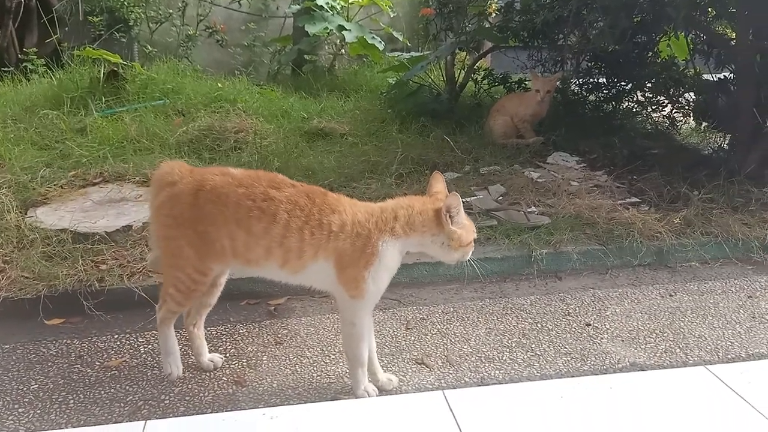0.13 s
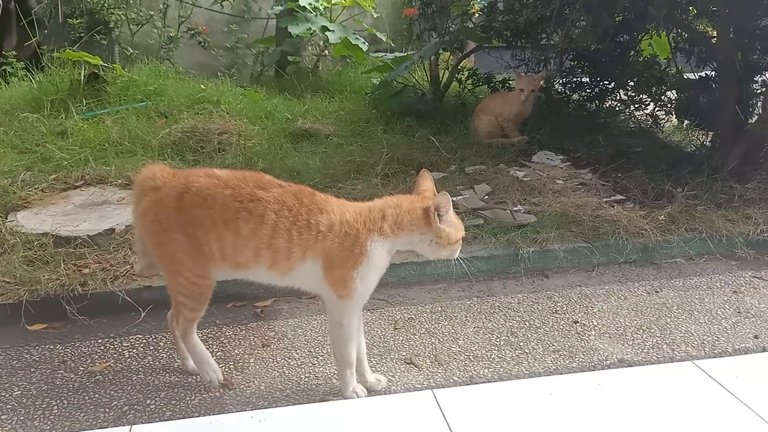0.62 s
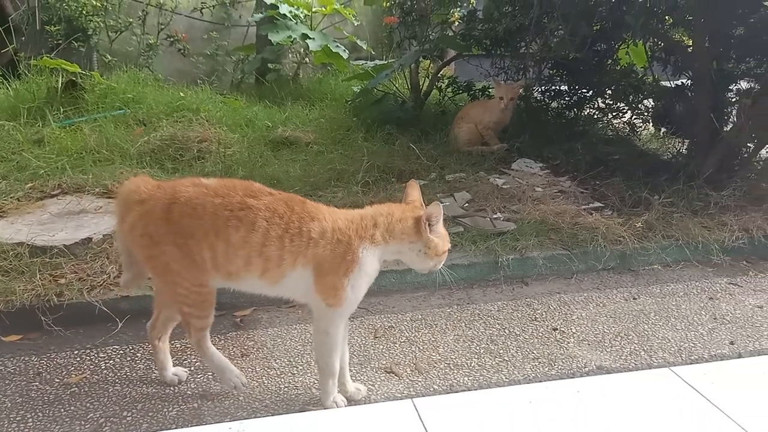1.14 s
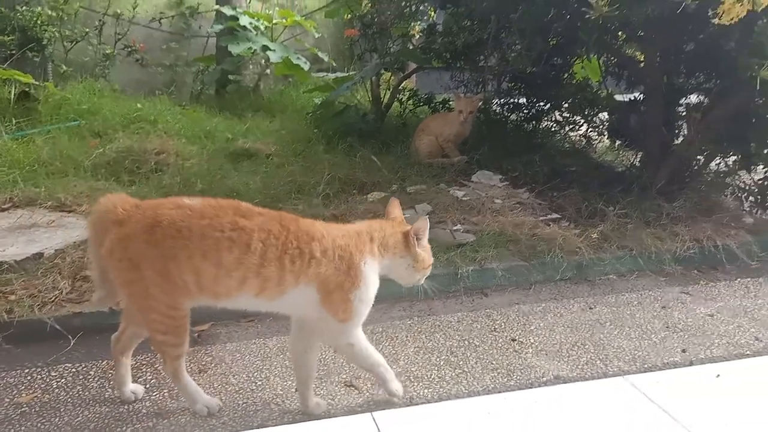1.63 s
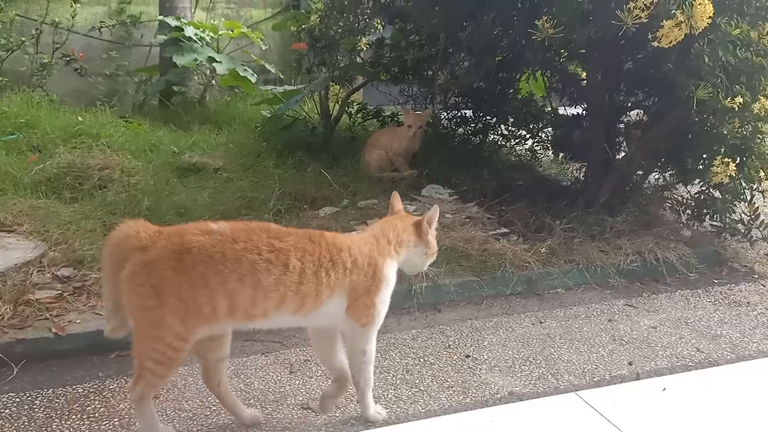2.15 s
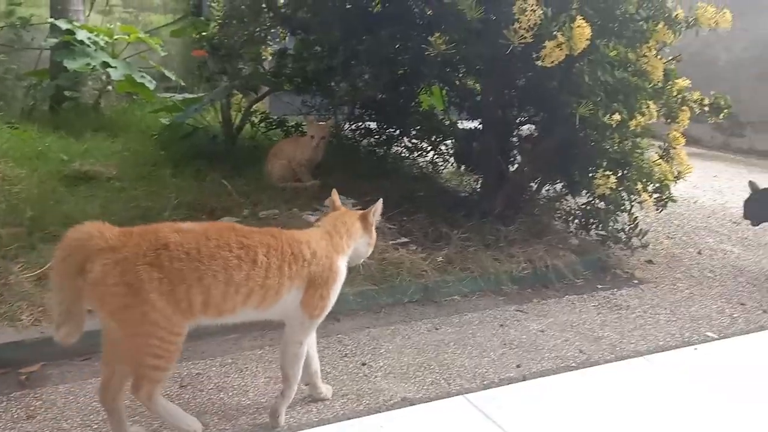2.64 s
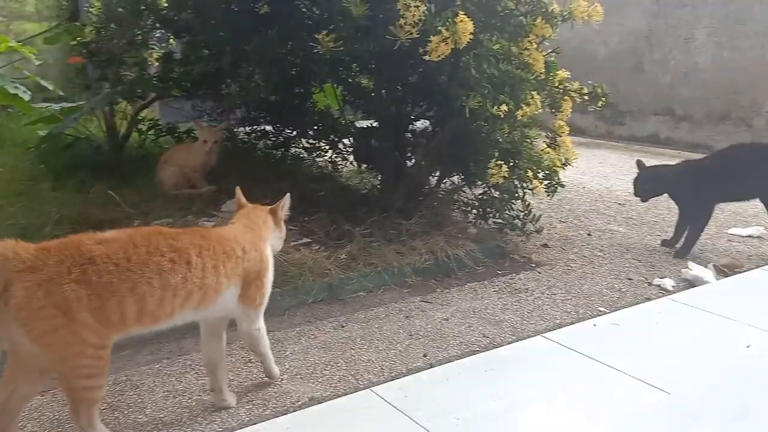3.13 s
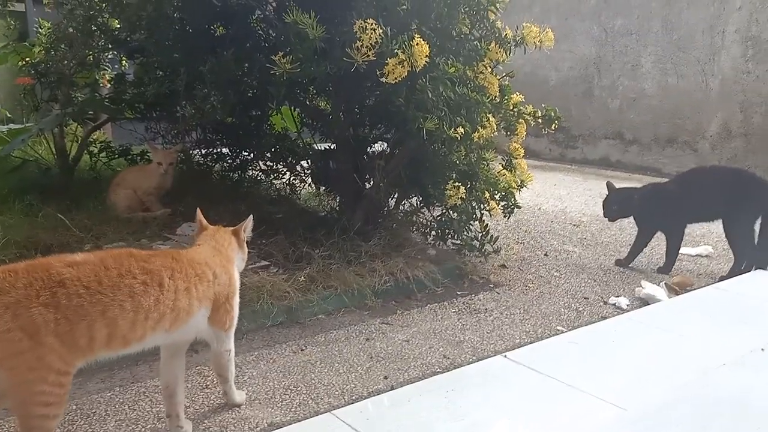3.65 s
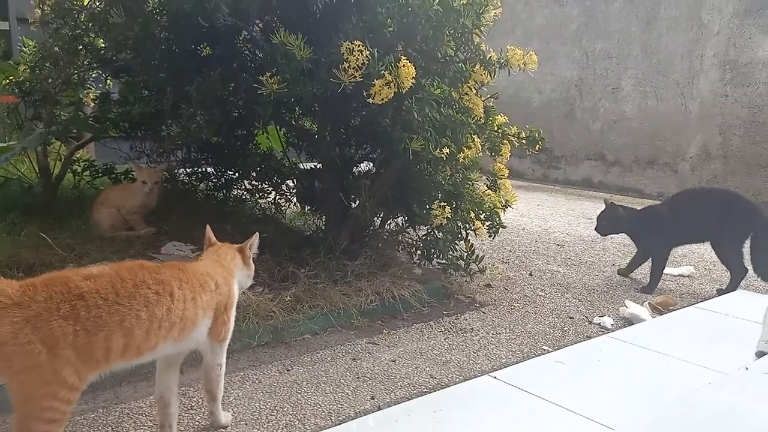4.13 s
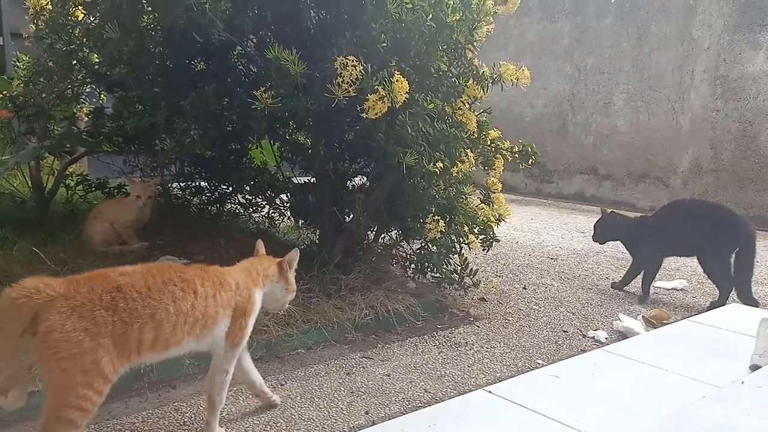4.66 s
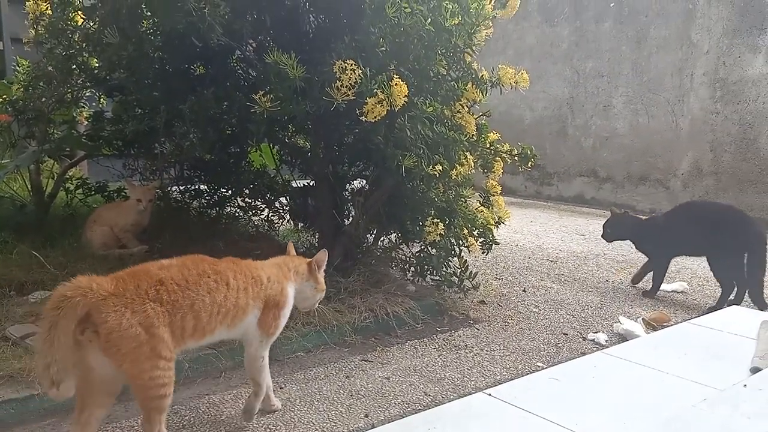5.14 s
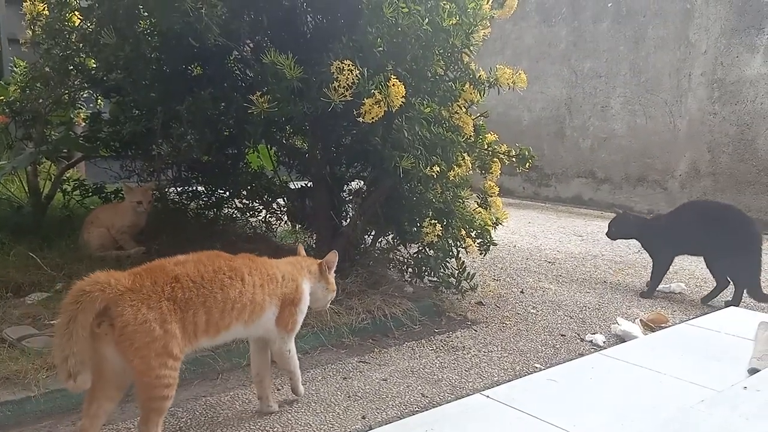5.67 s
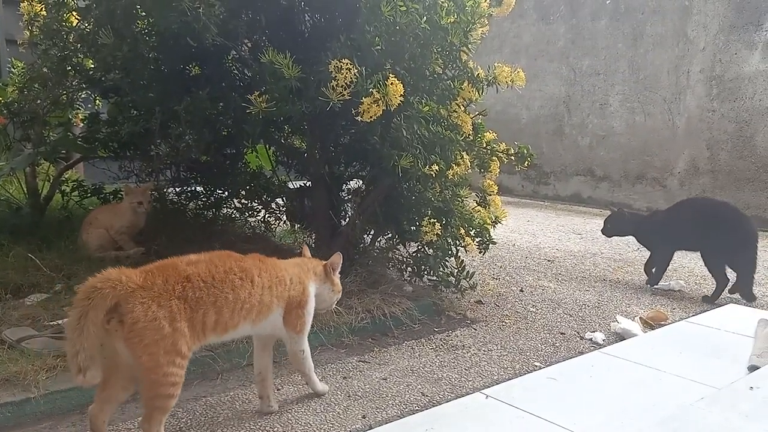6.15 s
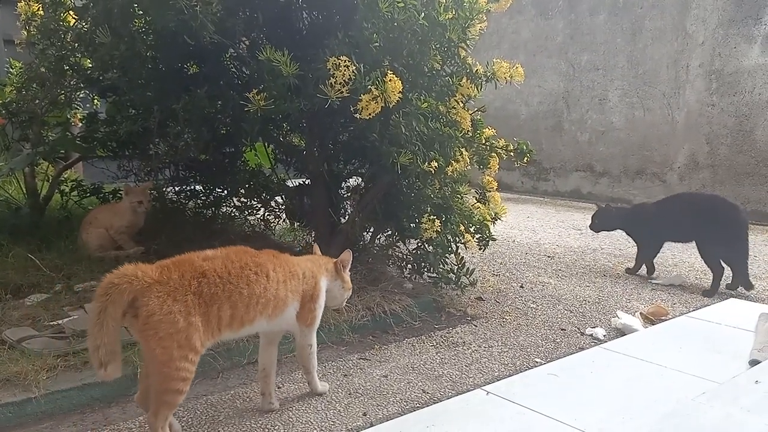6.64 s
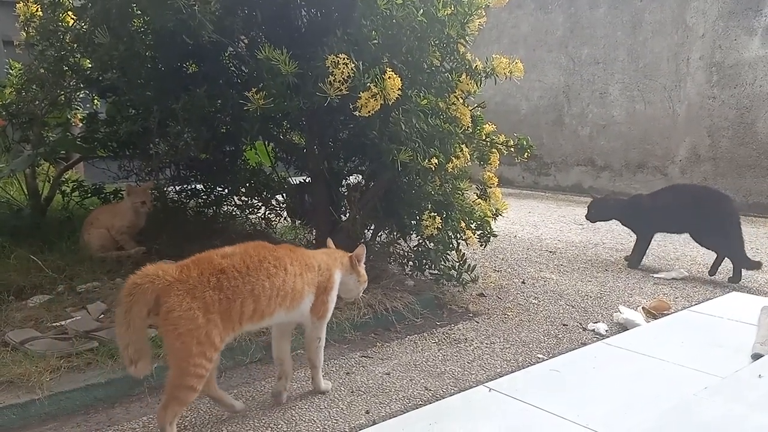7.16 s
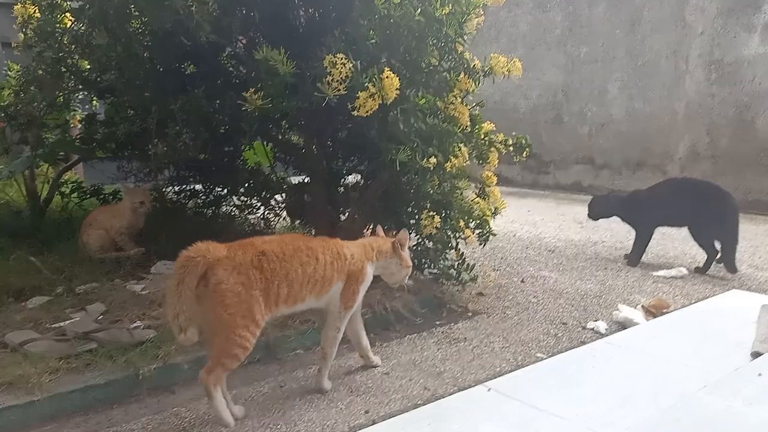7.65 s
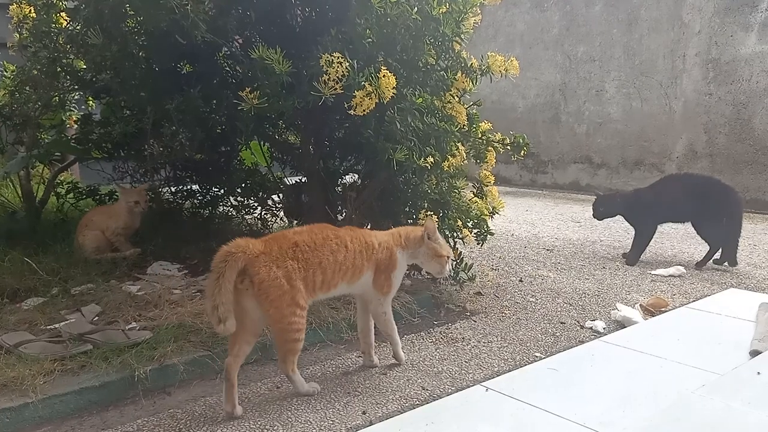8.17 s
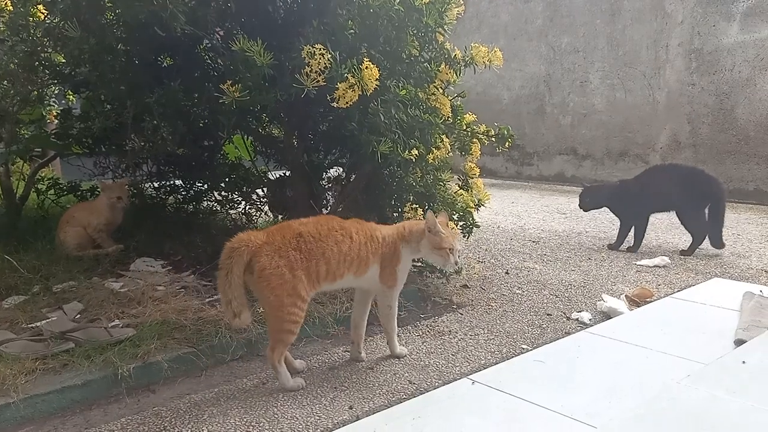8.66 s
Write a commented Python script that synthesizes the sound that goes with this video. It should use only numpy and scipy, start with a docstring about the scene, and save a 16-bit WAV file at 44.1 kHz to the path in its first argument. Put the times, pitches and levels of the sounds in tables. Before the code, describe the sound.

Several cats caterwaul outdoors, bright open-mouthed yowls and darker wavering moans overlapping almost without pause, with slight yard echo and faint low rumble.

```python
"""Yowling cats in a walled yard

Several cats, with bright open-mouthed and darker voices, yowl over one another near a hand-held phone.
Each yowl is a sum of harmonics on a gliding pitch, shaped by moving throat and mouth resonances;
breath modulates each line, and alternating strong and weak pulses add lines half-way between.
Delayed copies and a decaying noise tail give the yard; filtered noise gives rumble and hush; soft ticks,
and at 4.82 s a short hissing catch of breath, are decaying mixtures of a low tone and noise."""
import sys
import numpy as np
from scipy import signal
from scipy.fft import rfft, irfft, next_fast_len
from scipy.io import wavfile
from scipy.ndimage import uniform_filter1d

SR = 44100
rng = np.random.default_rng(int(sys.argv[2]) if len(sys.argv) > 2 else 0)


def int16_out(signal):
    """Quantize to a 16-bit WAV file."""
    q = np.round(np.clip(np.atleast_2d(signal).T, -1, 1) * 32767)
    wavfile.write(sys.argv[1], SR, q.astype(np.int16))


def voltage_ratio(decibels):
    """Convert decibels (scalar or array-like) to amplitude ratios, 20 dB per decade."""
    exponent = np.asarray(decibels, float) / 20
    return 10 ** exponent


N = 387638


def colour(x, points):
    """Linear filtering: multiplies the spectrum by a gain curve, (f/Hz, level/dB) joined on a log axis."""
    hz, db = np.transpose(points)
    # a mirrored, fading edge past the end softens the cut
    edge = x[..., :-2049:-1] * np.linspace(1, 0, 2048)
    x = np.concatenate([x, edge], axis=-1)
    size = next_fast_len(N + 4096)
    f = np.maximum(np.arange(size // 2 + 1) * SR / size, 1)
    gain = voltage_ratio(np.interp(np.log(f), np.log(hz), db))
    return irfft(rfft(x, size) * gain, size)[..., :N]


def unit(x):
    """Normalisation of signal power: scales to rms 1."""
    return x / np.sqrt(np.mean(x ** 2))


def walk(rate, count):
    """Low-pass random process: smooth chance of spread about 1 that turns about rate times a second."""
    k = max(int(SR / rate), 2)
    steps = rng.standard_normal(count // k + 3)
    joined = np.interp(np.arange(count) / k, np.arange(len(steps)), steps)
    return 2.01 * uniform_filter1d(joined, k // 2)


def overtones(rows, tract):
    """Source-filter principle: gives the dB of overtone k, lifted by two moving resonances."""
    s, hz, level_db, throat_hz, mouth_hz, mouth_db, high_db = np.transpose(rows)
    (throat_width_hz, mouth_width_hz), low_db, middle, chest_db_per_octave = tract
    middle_hz, middle_db = np.transpose(middle)
    chest_hz = 406  # below this pitch the lowest overtones gain weight

    def db_of(k, t):
        f = k * np.interp(t, s, hz)
        level = voltage_ratio(np.interp(t, s, level_db))
        throat_offset = (f - np.interp(t, s, throat_hz)) / throat_width_hz
        throat = level / (1 + throat_offset ** 2)
        mouth_offset = (f - np.interp(t, s, mouth_hz)) / mouth_width_hz
        mouth = level * voltage_ratio(np.interp(t, s, mouth_db)) / (1 + mouth_offset ** 2)
        # away from the resonances
        if k <= len(low_db):
            chest_db = chest_db_per_octave * np.log2(np.maximum(chest_hz * k / f, 1)) / k
            away = level * voltage_ratio(np.interp(k, np.arange(len(low_db)) + 1, low_db) + chest_db)
        else:
            away_db = np.interp(np.log(f), np.log(middle_hz), middle_db)
            away = voltage_ratio(np.interp(t, s, high_db) + away_db)
        return 10 * np.log10(throat ** 2 + mouth ** 2 + away ** 2)
    return db_of


def yowl(rows, kind, db_of, played, jitter, shimmer_db, rasp_db, mouth=None, hoarse_db=-17, sway_db=3):
    """Additive synthesis: harmonics of one wavering pitch, each modulated in amplitude by breath."""
    # kind is 0 for a bright voice, 1 for a dark one
    # unsteady folds, quick scatter of the pitch: t/s, bright voices scatter/%, dark voices scatter/%
    croak = [(0, .8, .1), (.12, 2.2, .1), (.22, 1.4, .1), (.3, .12, .08), (1.1, .12, .08), (1.3, .25, .08),
             (2.2, .25, .08), (2.5, .15, .08), (3.35, 1.3, .06), (3.55, .7, .1), (3.85, .4, .15),
             (4.0, .15, .15), (4.2, .3, .15), (4.5, .15, .15), (5.0, .15, .15), (5.4, .3, .15),
             (5.62, .3, 1.5), (5.74, .3, 1.1), (5.84, .35, .3), (6.0, .3, .25), (6.3, .25, .15),
             (6.6, .4, .15), (6.72, 1.6, .15), (6.82, .35, .15), (7.1, .45, .15), (7.3, .35, .15),
             (7.5, .15, .15), (7.72, 1.8, .15), (7.84, .3, .15), (7.95, .06, .15), (8.79, .1, .15)]
    # turbulent breath near the front of the mouth: t/s, bright voices level/dB, dark voices level/dB re the line
    breath_levels = [(0, -22, -30), (1.1, -24, -30), (1.35, -18, -30), (2.0, -19, -30), (2.4, -28, -24),
                     (3.0, -24, -19), (3.4, -18, -20), (4.0, -26, -28), (5.0, -30, -28), (5.3, -18, -28),
                     (5.5, -18, -14), (5.7, -24, -10), (6.25, -16, -14), (6.45, -26, -24), (6.85, -20, -22),
                     (7.05, -12, -16), (7.35, -13, -16), (7.55, -22, -12), (8.0, -26, -6), (8.79, -22, -6)]
    # centre of the breath band for the bright and the dark voices: f/Hz
    breath_hz = (2800, 2600)
    breath_width_hz = 450  # half-width

    s, hz, *columns = np.transpose(rows)
    start, stop = int(max(s[0], 0) * SR), min(int(s[-1] * SR), N)
    stop = N if stop > N - 999 else stop  # a yowl that lasts past the end
    t = np.arange(start, stop) / SR
    count = len(t)

    # slack folds: a fast scoop or drop croaks; its high overtones are weaker and ring lower
    pitch = np.interp(t, s, hz)
    glide = abs(np.gradient(np.log(pitch))) * SR
    slack = np.clip(uniform_filter1d(glide, size=900) / 4.0, 0, 1) ** 2
    pitch = pitch * (1 + jitter * walk(60, count) + 0.0077 * slack * walk(150, count))
    times, *percent = np.transpose(croak)
    scatter = walk(260, count)
    scatter = scatter - uniform_filter1d(scatter, size=900)  # the mean pitch holds
    pitch = pitch * (1 + np.interp(t, times, percent[kind]) / 100 * scatter)
    phase = 2 * np.pi * np.cumsum(pitch) / SR

    times, *breath_db = np.transpose(breath_levels)
    breath_depth = voltage_ratio(np.interp(t, times, breath_db[kind]))

    def breath(k):
        return breath_depth / (1 + ((k * pitch - breath_hz[kind]) / breath_width_hz) ** 4)

    out = 0
    for k in played:
        rasp = (voltage_ratio(rasp_db) + 0.051 * slack + breath(k)) * walk(280, count)
        shimmer = shimmer_db * np.sqrt(k / 3) * walk(29.84, count)
        out = out + voltage_ratio(db_of(k, t) + shimmer) * (1 + rasp) * np.sin(k * phase + k * k)
    if mouth:
        f, db = np.transpose(mouth)
        high = 0
        for k in range(len(played) + 1, 36):
            flutter_db = sway_db * walk(6.81, count) + 0.87 * sway_db * walk(25.14, count)
            rasp = (voltage_ratio(hoarse_db) + breath(k)) * walk(500, count)
            seen_hz = k * pitch * (1 + 0.28 * np.sqrt(slack))
            line_db = np.interp(np.log(seen_hz), np.log(f), db) + flutter_db
            high = high + voltage_ratio(line_db) * (1 + rasp) * np.sin(k * phase + k * k)
        # the running rms is levelled, so the last column of rows sets the strength
        spread = np.sqrt(2 * uniform_filter1d(high ** 2, size=8192))
        out = out + voltage_ratio(np.interp(t, s, columns[-1]) - 9 * np.sqrt(slack)) * high / spread

    fade_in = t - s[0] + (start == 0)
    fade_out = s[-1] - t + (stop > N - 999)
    fade = np.clip(np.minimum(fade_in, fade_out) / 0.0071, 0, 1)
    voice = np.zeros(N)
    voice[start:stop] = np.sqrt(2) * out * fade
    return voice


def bright_voices():
    """Vocal-tract resonance: open-mouthed yowls whose jaw opening filters the high overtones."""
    # yowls: t/s, pitch f/Hz, level/dB, throat resonance f/Hz, mouth resonance f/Hz,
    # mouth resonance level/dB re the level, high overtones level/dB
    yowls = [
        [(0.0, 227.4, -48, 1283, 2180, -46, -61), (0.04, 226, -49, 1230, 2150.0, -43, -54.5),
         (0.076, 279.6, -50.5, 984, 2160, -36.5, -74.5), (0.12, 326.1, -36, 1000, 2264, -25, -70.5),
         (0.185, 382.7, -29.5, 1015, 2330, -17, -57.5), (0.209, 380.6, -37.5, 1059, 2190, -21, -58.5),
         (0.27, 391.1, -31.5, 1080, 2303, 1, -59.5), (0.331, 388.4, -30.5, 1046, 2350, -20.5, -56.5),
         (0.433, 380.8, -32.5, 1478, 2493, -6, -58.5), (0.577, 372.1, -28.5, 984, 2484, -7.5, -61),
         (0.68, 381, -31, 1064, 2414, -7, -59.5), (0.976, 369.5, -26, 1285, 2490, -9, -57),
         (1.102, 354.4, -28, 1394, 2274, -7, -54), (1.2, 364.9, -25.5, 1295, 1785, -8.5, -51),
         (1.299, 372, -28.5, 1215, 1802, 1, -43), (1.323, 380.7, -27, 1416, 1880, 3, -42),
         (1.5, 371.7, -26.5, 1268, 2050, 1.5, -46), (1.639, 370.5, -30.5, 1273, 1940, 9.5, -49),
         (1.726, 369, -27.5, 1260, 1984, -0.5, -43.5), (1.798, 372.1, -31, 1204, 2170, 0.5, -46),
         (1.822, 369.2, -28.5, 1386, 1844, 2.5, -45.5), (1.871, 364.4, -26.5, 1370, 1780, -6.5, -49),
         (1.933, 360.5, -27.5, 1230, 1926, 5, -50), (1.996, 356.1, -29, 1333, 1890, 8, -49.5),
         (2.202, 338.5, -30.5, 1195, 1812, 0.5, -54.5), (2.456, 337.6, -30.5, 1204, 1650, -20.5, -54.5),
         (2.722, 328.7, -34, 1042, 1956, -23.5, -62), (2.82, 316.5, -33.5, 923, 2200, -40, -71.5),
         (2.852, 321.2, -34, 945, 2390, -29, -64), (2.978, 275.7, -58.5, 870, 2710, 14.5, -79)],
        [(3.317, 273.2, -57.5, 820, 2260, -29, -92), (3.39, 331.2, -46.5, 965, 2420, -17.5, -79.5),
         (3.461, 389.4, -34, 1108, 2556, -6.5, -71), (3.53, 397.3, -40, 1290, 2665, -19, -75.5),
         (3.612, 420.1, -33.5, 1306, 2490, -39, -72), (3.74, 441.6, -31, 1306, 2404, -28, -68.5),
         (3.79, 429, -34.5, 1316, 2580, -14, -66.5), (3.87, 435, -37, 1358, 2450, -31.5, -67.5),
         (3.99, 447, -29, 1470, 2510, -20, -62.5), (4.124, 453, -26.5, 1515, 2486, -8, -59.5),
         (4.192, 461.5, -28.5, 1558, 2504, -8, -59), (4.248, 463.8, -28, 1440, 2500, -7, -64),
         (4.33, 465, -26, 1417, 2536, -6.5, -67), (4.483, 454.7, -30, 987, 2654, -28.5, -69),
         (4.66, 424, -29, 1067, 2644, -10.5, -66), (4.739, 413.5, -34.5, 919, 2454, -16.5, -64.5),
         (4.857, 398.7, -40, 974, 2390, -19.5, -67), (5.027, 375.6, -34.5, 1136, 2757, -9, -65.5),
         (5.132, 368, -34, 1340, 2850, -12, -62.5), (5.302, 371, -33, 1350, 2786, -13.5, -63.5),
         (5.364, 384.3, -33, 1324, 2993, -8.5, -61), (5.427, 395.5,  -32, 1412, 2676, -14, -65),
         (5.664, 406, -30.5, 1105, 2677, -8, -69), (5.717, 400.7, -28, 1040, 2650, -8.5, -64.5),
         (5.824, 387, -40, 1222, 2620, -5, -63), (5.88, 369.5, -40, 1280, 2500, -37, -64.5),
         (6.333, 358.3, -41, 1238, 2510, -50, -66.5), (6.473, 346.2, -39.5, 1123, 2367, -13.5, -76),
         (6.525, 338, -42, 845, 2310, -9, -88), (6.646, 310, -49, 1100, 1890, -11.5, -84.5),
         (6.74, 270.4, -53, 894, 2020, -0.5, -63.5)],
        [(6.66, 246.8, -53.5, 981, 1854, -12.5, -75), (6.751, 324, -39, 900, 2160, -9, -74),
         (6.794, 370.5, -32, 1226, 2460, -10, -60), (6.881, 390.4, -25.5, 1130, 2224, -14, -62.5),
         (6.98, 388.1, -27, 1204, 2050, -23, -59), (7.075, 379.4, -28, 1244, 1840, -18, -57),
         (7.153, 377.8, -32, 1253, 1830, -8.5, -57.5), (7.233, 373.4, -30.5, 1265, 2130, -30.5, -58),
         (7.33, 374, -32, 1285, 2105, -13.5, -57), (7.372, 381.3, -28.5, 1223, 2157, -19, -64),
         (7.435, 390, -28.5, 1060, 2460, -15, -58), (7.508, 387.6, -26, 1020, 2386, -24, -66.5),
         (7.572, 382.9, -32, 930, 2203, -7.5, -66.5), (7.628, 375.5, -38.5, 956, 2270, -44, -71),
         (7.837, 342, -40, 822, 2170, -8.5, -68), (7.877, 311.4, -47.5, 860, 2290, -13, -69.5)],
        [(7.628, 220.8, -65.5, 1066, 2170, -37, -78), (7.678, 286.6, -42, 1055, 2190, -30, -82),
         (7.724, 351.8, -36.5, 1054, 2137, -13.5, -95), (7.788, 402.7, -29, 942, 2283, -29, -100),
         (7.851, 444, -29.5, 1045, 2154, -16.5, -66.5), (7.904, 460, -30, 1142, 2363, -12, -63.5),
         (7.95, 458, -29.5, 1180, 2232, -1, -61), (8.248, 463.7, -25.5, 1078, 2015, -15.5, -61.5),
         (8.443, 457.6, -33.5, 1084, 2087, -3.5, -57.5), (8.55, 454, -31, 1140, 2314, -22.5, -56.5),
         (8.785, 415.5, -34, 915, 2703, -5, -71)],
    ]
    # half-way lines of the second and third yowl: t/s, level/dB re whole overtones, before a tilt by order
    doubled = [
        [(5.0, -44), (5.08, -31), (5.18, -17.5), (5.3, -9.5), (5.42, -15), (5.5, -8.5), (5.56, -11),
         (5.62, -16.5), (5.721, -34.5)],
        [(6.9, -42), (7.0, -31.5), (7.1, -27.5), (7.2, -21), (7.3, -38), (7.45, -42)],
    ]
    # mouth and microphone on the high overtones, jaws wide: f/Hz, relative level/dB
    wide = [(2600, 0), (3200, -6.5), (4200, -19), (5300, -10), (6050, -19.5), (7050, -10.5), (7600, -31.5),
            (8400, -45), (9500, -64.5)]
    # the same, jaws narrow: f/Hz, relative level/dB
    narrow = [(2400, 10.5), (3300, -29), (4000, -26.5), (5000, -13), (6000, -21.5), (7000, -15),
              (7700, -38), (8800, -31), (10500, -58.5)]
    # the same, narrow jaws held still: f/Hz, relative level/dB
    ringing = [(3200, -6), (3700, -20), (4100, -27), (4600, -10), (5050, 4.5), (5500, -17), (6300, -13),
               (6900, -8), (7500, -18.5), (8300, -29.5), (9000, -45.5)]
    # tract: (throat, mouth half-width f/Hz), overtones 1 to 3 off resonance level/dB re the level,
    # middle overtones off resonance (f/Hz, level/dB re the high ones), chest weight/(dB per octave)
    open_tract = (121, 119.4), (-31, -16.5, -23), [(1200, -2.5), (1800, -17.5), (2400, 9), (3000, -0.5),
                  (3600, -2)], 34.6
    # the tract of the last two yowls, same columns
    narrow_tract = (106.4, 91), (-24, -16, -23), [(1200, 2), (1800, -13.5), (2400, 4.5), (2750, 3.5),
                    (3050, -16.5), (3600, -17.5)], 34

    # jaws, hoarseness/dB, flutter/dB
    mouths = (wide, -21, 2), (wide, -14, 3), (narrow, -25, 2), (ringing, -21, 1.2)
    tracts = 2 * [open_tract] + 2 * [narrow_tract]
    voices = sum(yowl(rows, 0, overtones(rows, tract), range(1, 9), 0.001, 1.0, -33.5, *mouth)
                 for rows, mouth, tract in zip(yowls, mouths, tracts))
    return voices + sum(map(half_lines, yowls[1:], tracts[1:], doubled))


def dark_voices():
    """Vocal-tract resonance: moans with lower throat and mouth resonances and less open jaws."""
    # moans: t/s, pitch f/Hz, level/dB, throat resonance f/Hz, mouth resonance f/Hz,
    # mouth resonance level/dB re the level, high overtones level/dB
    moans = [
        [(0.0, 504.6, -24.5, 740, 1444, -32, -67.5), (0.12, 522.7, -29, 565, 1345, 3, -53.5),
         (0.271, 509.8, -30.5, 671, 1693, -5, -79.5), (0.673, 496.4, -37, 522, 1802, 10.5, -70.5),
         (0.851, 482.0, -37.5, 543, 1782, 1.5, -75.5), (0.93, 464, -38, 631, 1744, -13.5, -68.5),
         (0.998, 473.3, -39.5, 574, 1470, 10.5, -60.5), (1.136, 443.4, -39.5, 599, 1536, -10, -62.5),
         (1.298, 445.4, -38.5, 680, 2014, -11, -62.5), (1.462, 438.7, -43, 778, 2104, -3.5, -71.5),
         (1.926, 443, -43.5, 793, 2064, 4.5, -65.5), (2.143, 440.6, -47.5, 818, 1674, 14, -63.5),
         (2.198, 438.5, -47.5, 799, 1250, 0.5, -53.5), (2.328, 433.3, -50, 841, 1465, -6, -68.5),
         (2.501, 433.4, -43.5, 807, 1510, -8.5, -81.5), (2.835, 427.2, -38, 811, 2068, -15, -60),
         (3.0, 424.3, -34.5, 766, 2037, -19.5, -72), (3.2, 423, -33.5, 737, 2063, -24, -70.5),
         (3.35, 423.4, -30.5, 736, 2020, -24, -70), (3.519, 423.2, -28, 684, 2024, -34.5, -80),
         (3.6, 419.4, -33, 683, 2100, -28.5, -67), (3.731, 430, -30, 691, 1660, -34, -63.5),
         (3.85, 413.4, -28.5, 716, 1610, -27.5, -67), (3.918, 400, -38, 494, 1460, -30.5, -77.5),
         (3.932, 399, -31.5, 505, 1390, -30, -83), (3.952, 363, -31.5, 607, 1374, -31.5, -82),
         (3.985, 318, -35.5, 484, 1350, -27, -82), (4.0, 315, -58, 516, 1320, -27, -86)],
        [(5.627, 275.2, -46.5, 808, 1190, -12, -73), (5.668, 337.3, -31, 670, 1300, -13, -62),
         (5.736, 455.6, -31, 766, 1320, -11, -64), (5.822, 520.5, -28, 896, 1340, -5.5, -61.5),
         (5.98, 512.8, -31, 936, 1418, -3, -65.5), (6.04, 506.1, -30, 848, 1455, -11.5, -66.5),
         (6.085, 509.5, -27, 838, 1533, -4, -68.5), (6.125, 498, -33, 776, 1537, -17.5, -62.5),
         (6.2, 506.6, -33, 720, 1758, -3.5, -76), (6.28, 500.3, -35.5, 772, 1883, -7, -67),
         (6.31, 492.2, -32.5, 818, 1890, 2, -69), (6.36, 493, -32.5, 775, 1900, -8, -72.5),
         (6.385, 488.6, -31, 777, 2150, -9.5, -60), (6.486, 500.6, -32, 771, 1440, -11.5, -63),
         (6.562, 516.3, -41, 625, 1352, 16, -61.5), (6.632, 527.2, -25, 761, 1290, 3, -66),
         (6.69, 520.3, -33, 770, 1410, 2, -59.5), (6.842, 510, -39, 541, 1817, -5, -79),
         (6.867, 491.5, -51.5, 456, 1665, 5, -83.5), (6.935, 474.2, -52, 516, 2344, 6.5, -78),
         (7.053, 440.7, -30.5, 700, 1720, -25.5, -68), (7.732, 411, -35.5, 624, 1320, -34.5, -72),
         (7.838, 394.4, -32, 598, 1186, -23.5, -78.5), (7.944, 371.4, -40, 545, 1290, -50, -83.5),
         (7.977, 356.8, -35.5, 497, 1284, -22, -67.5), (8.14, 300.7, -37, 560, 1312, -46, -69),
         (8.313, 322.6, -37.5, 567, 1590, -23.5, -72.5), (8.341, 333, -34, 643, 1770, -18.5, -68),
         (8.441, 343.3, -34, 665, 1680, -19, -74.5), (8.785, 343.7, -35, 601, 1837, -27.5, -66.5)],
    ]
    # the last wisp of an earlier moan, same columns
    wisp = [(0.0, 394.5, -33, 970, 1555, -20, -68.5), (0.182, 358, -57.5, 993, 1440, -25.5, -80.5)]
    # mouth and microphone on the high overtones, jaws nearly shut: f/Hz, relative level/dB
    dull = [(2000, 0), (3400, -2), (3750, -18), (4600, -28), (9000, -38)]
    # the same, jaws a little apart: f/Hz, relative level/dB
    parted = [(2400, 0), (3200, -8), (3800, -17), (4600, -9), (5300, -14), (7000, -18), (8000, -36),
              (9500, -50)]
    # tract: (throat, mouth half-width f/Hz), overtones 1 to 3 off resonance level/dB re the level,
    # middle overtones off resonance (f/Hz, level/dB re the high ones), chest weight/(dB per octave)
    tract = (84, 99), (-15.5, -14, -45.5), [(1200, -39.5), (1800, -4.5), (2400, -6.5), (3000, -28.5)], 14
    # half-way lines of the first moan: t/s, level/dB re whole overtones, before a tilt by order
    doubled = [(2.85, -26), (2.98, -3), (3.2, -14.5), (3.4, -8), (3.5, -26)]

    voices = sum(yowl(rows, 1, overtones(rows, tract), range(1, 6), 0.0012, 1.2, -38, jaws, -13, 4)
                 for rows, jaws in zip([*moans, wisp], [dull, parted, dull]))
    return voices + half_lines(moans[0], tract, doubled, 1, range(4, 6))


def in_yard(voice, echoes, wet_db, t60):
    """Reflection and reverberation: echoes make the two ports differ; the walls add a short haze."""
    # difference of the ports against their common part: f/Hz, level/dB
    side_points = [(180, -19), (500, -8.5), (1000, -6), (2000, -0.5), (5000, 0)]
    side = sum(sign * voltage_ratio(db) * np.roll(voice, int(ms * SR / 1000)) for ms, db, sign in echoes)
    side = colour(side * np.std(voice) / np.std(side), side_points)

    # exponential decay, 60 dB in t60 seconds, after a 12 ms gap
    t = np.arange(SR // 2) / SR
    tail = rng.standard_normal((2, len(t))) * np.exp(-np.log(1000) * t / t60) * (t > .012)
    haze = signal.fftconvolve(voice[None], unit(tail) / np.sqrt(len(t)), axes=1)[:, :N]
    # the walls favour the upper middle
    haze = colour(haze, [(300, 2), (1000, 3), (1800, 1), (3000, 7), (7000, 5)])
    return voice + side * np.array([[1], [-1]]) + voltage_ratio(wet_db) * haze


def turning_gains():
    """Level-difference panning: gains of both ports for each kind of voice as the phone turns in the hand."""
    # left minus right: t/s, bright voices level/dB, dark voices level/dB
    turn_points = [(0, 0, -0.5), (.5, 1, -6.5), (1.1, 0.5, 6.5), (1.7, -0.5, -7), (2.3, 0.5, 4),
                   (2.8, -1, 1.5), (3.4, 3, -2), (4.0, 3.5, -3), (4.5, 3, -2), (5.1, -2.5, 5), (5.6, -2, 5),
                   (6.2, 0.5, -4), (6.8, -0.5, 7.5), (7.2, -1.5, -6), (7.6, -1, -3.5), (8.2, 0.5, 2.5),
                   (8.79, -1, -8)]
    s, *pan_db = np.transpose(turn_points)
    t = np.arange(N) / SR
    halves = np.array([[.5], [-.5]])
    return [voltage_ratio(np.interp(t, s, db) * halves) for db in pan_db]


def background():
    """Filtered noise: low rumble in gusts, much alike on both ports, over a faint hush."""
    # gusts: t/s, level/dB
    gusts = [(0, -70), (.12, -72.5), (.9, -71.5), (1.3, -73.5), (1.9, -73.5), (2.15, -64.5), (2.399, -72),
             (2.8, -68), (3.7, -71.5), (4.1, -72), (4.35, -69.5), (4.5, -64), (4.65, -60.5), (4.75, -66.5),
             (4.9, -61), (5.05, -64), (5.2, -61.5), (5.35, -65), (5.55, -65.5), (5.9, -67.5), (6.301, -72),
             (6.5, -72.5), (6.7, -59.5), (7, -75.5), (7.4, -68.5), (7.8, -73), (8.79, -71)]
    # spectrum of the rumble: f/Hz, relative level/dB
    rumble_colour = [(25, -33.5), (50, -18.5), (100, -4), (135, -8), (185, -9), (310, -15.5), (500, -43.5)]
    # spectrum of the hush: f/Hz, relative level/dB
    hush_colour = [(40, -40), (150, -16), (300, -12), (1000, -15), (3000, -28), (3800, -38), (7500, -40),
                   (8300, -60)]
    mid, side = colour(rng.standard_normal((2, N)), rumble_colour)
    s, db = np.transpose(gusts)
    gust = voltage_ratio(np.interp(np.arange(N) / SR, s, db) + 1.5 * walk(16, count=N))
    rumble = gust * (unit(mid) + .3 * unit(side) * np.array([[1], [-1]]))
    hush = unit(colour(rng.standard_normal((2, N)), hush_colour))
    return rumble + voltage_ratio(-71) * hush


def ticks_and_catch():
    """Exponential decay of tone and noise: soft ticks, and at 4.82 s a short hissing catch of breath."""
    # events, before the filter: t/s, tone level/dB, noise level/dB re the tone, decay/ms
    events = [(.727, -73, -25, 11), (.775, -72, -25, 5.8), (1.382, -69, 18, 5), (4.82, -90, 20, 40)]
    out, t = np.zeros(N + 6000), np.arange(6000) / SR
    tone = np.sin(2 * np.pi * 220 * t)
    for s, db, noise_db, ms in events:
        shape = np.exp(-t * 1000 / ms) * np.clip(t * 2000 / ms, 0, 1)
        noise = voltage_ratio(noise_db) * rng.standard_normal(len(t))
        out[int(s * SR):][:len(t)] += voltage_ratio(db) * shape * (tone + noise)
    return colour(out[:N], [(60, -20), (170, 16), (3000, 16.0), (6000, 3), (8500, -32)])


def half_lines(rows, tract, doubled, kind=0, orders=range(1, 14)):
    """Period doubling: alternating strong and weak pulses put lines half-way between the overtones."""
    s, db = np.transpose(doubled)
    whole = overtones(rows, tract)
    inner = [row[:2] for row in rows if s[0] < row[0] < s[-1]]
    ends = [(edge, np.interp(edge, *np.transpose(rows)[:2])) for edge in s[[0, -1]]]

    def db_of(k, t):
        tilt_db = 1.5 * min(k, 8) - 1.4 * max(k - 8, 0) - 4
        return whole(k, t) + np.interp(t, s, db) + tilt_db

    pitch_rows = ends[:1] + inner + ends[1:]
    return yowl(pitch_rows, kind, db_of, np.array(orders) + .5, 0.00075, 1.3, -19.5)


def scene():
    """Superposition: the cats in the yard add to the background, the ticks and the catch of breath."""
    # echoes reaching the ports unequally, bright then dark voices: delay t/ms, relative level/dB, signed weight
    echoes = [
        [(.25, 15, 0.63), (2.9, 5.5, -0.53), (9.3, 19.5, 0.94)],
        [(.2, -11, -0.29), (3.7, 10, -0.0094), (12, 2.5, 1)],
    ]
    bright_gain, dark_gain = turning_gains()
    bright = bright_gain * in_yard(bright_voices(), echoes[0], wet_db=-12, t60=0.3)
    dark = dark_gain * in_yard(dark_voices(), echoes[1], wet_db=-11, t60=.35)
    return bright + dark + background() + ticks_and_catch()


def band_limit(x):
    """A steep low-pass at the top of the band."""
    return signal.sosfilt(signal.butter(12, 8540, fs=SR, output="sos"), x)


def record(dry):
    """Signal chain: the two port signals go through the last stage to give the finished sound."""
    return band_limit(dry)


dry = scene()
out = record(dry)
int16_out(out)
```